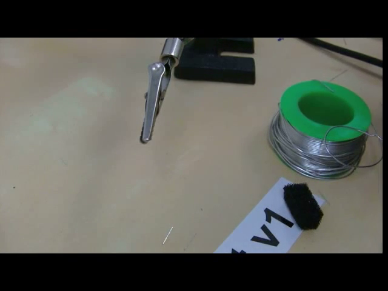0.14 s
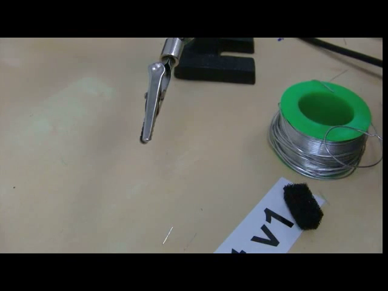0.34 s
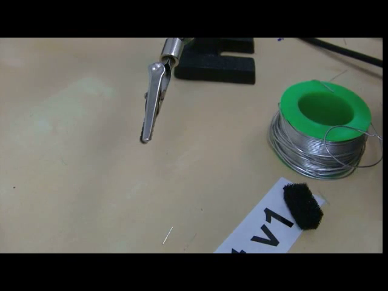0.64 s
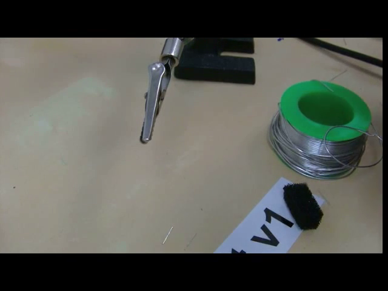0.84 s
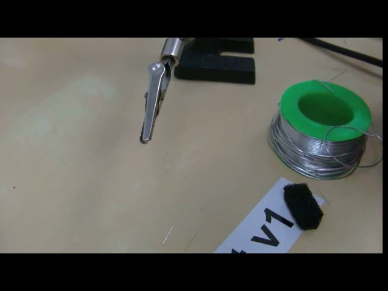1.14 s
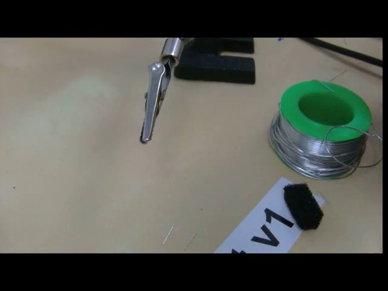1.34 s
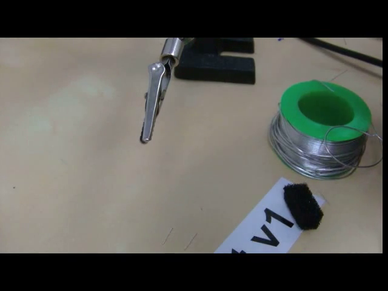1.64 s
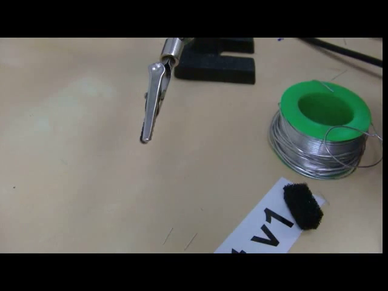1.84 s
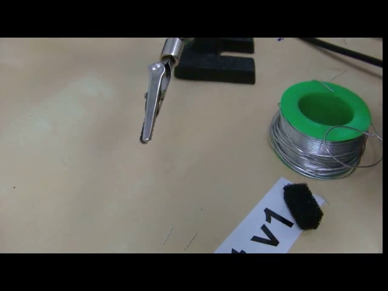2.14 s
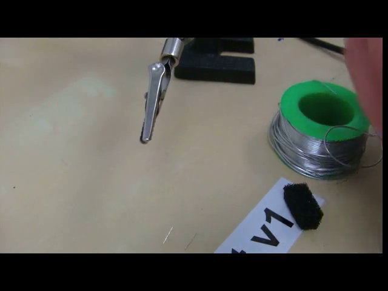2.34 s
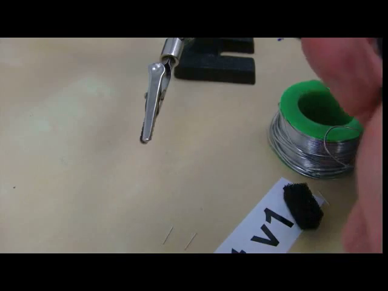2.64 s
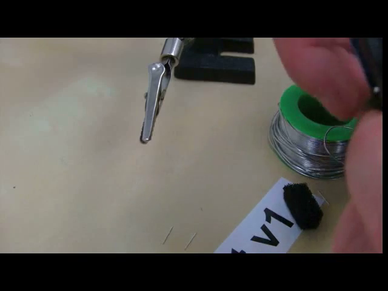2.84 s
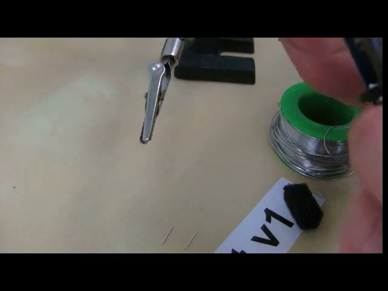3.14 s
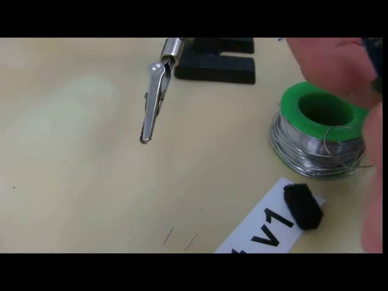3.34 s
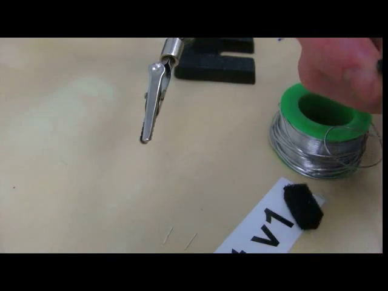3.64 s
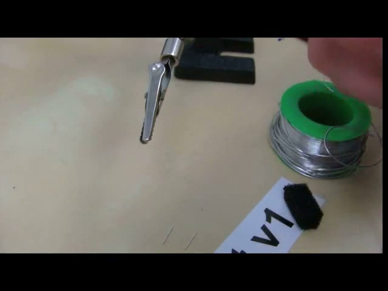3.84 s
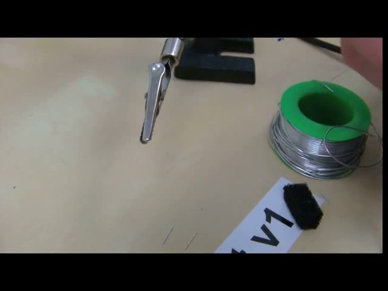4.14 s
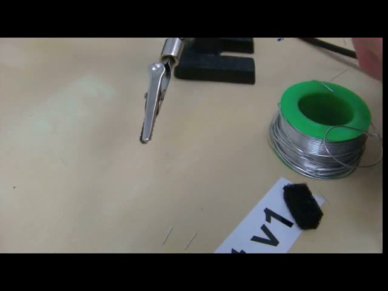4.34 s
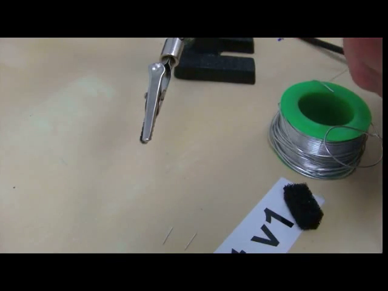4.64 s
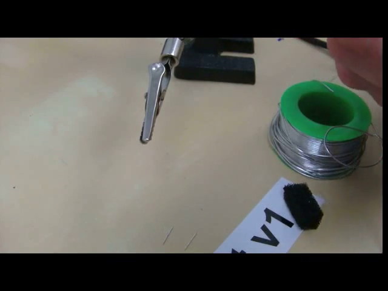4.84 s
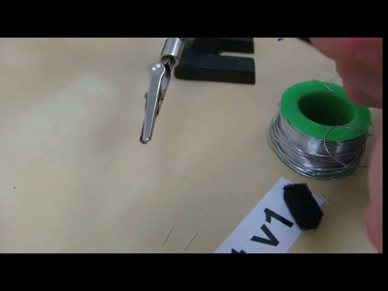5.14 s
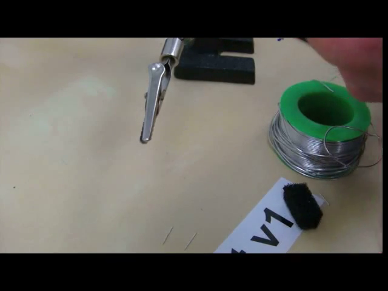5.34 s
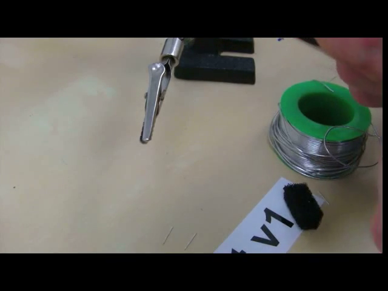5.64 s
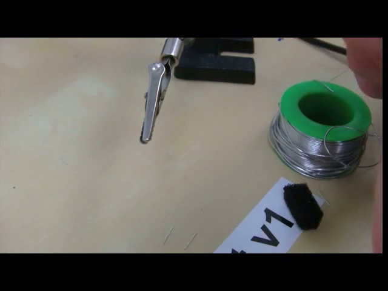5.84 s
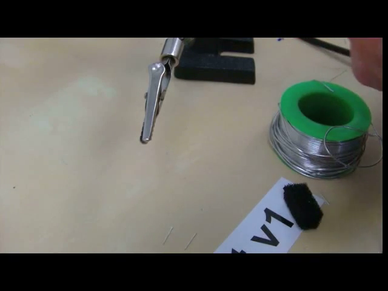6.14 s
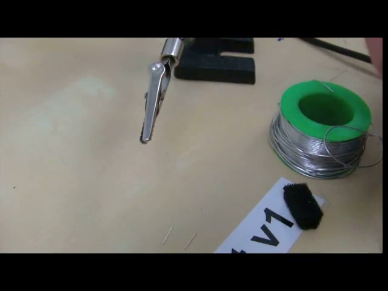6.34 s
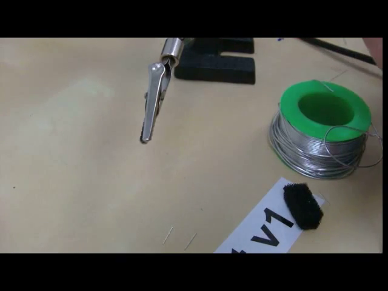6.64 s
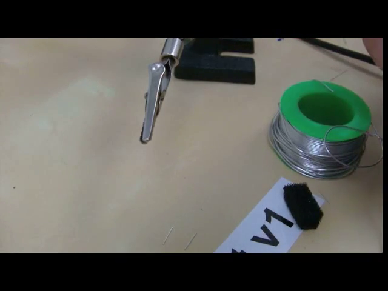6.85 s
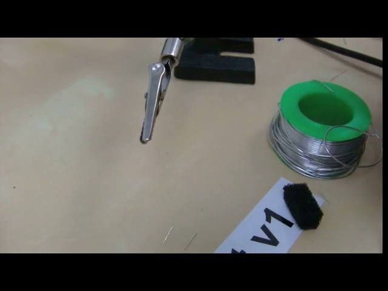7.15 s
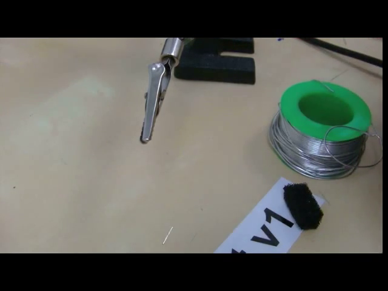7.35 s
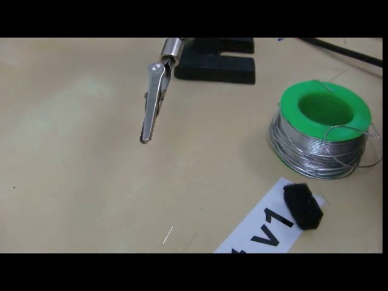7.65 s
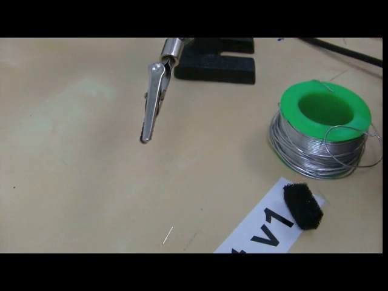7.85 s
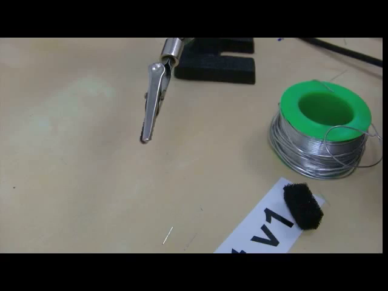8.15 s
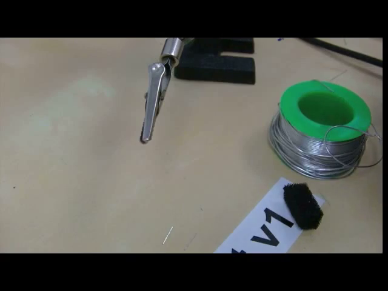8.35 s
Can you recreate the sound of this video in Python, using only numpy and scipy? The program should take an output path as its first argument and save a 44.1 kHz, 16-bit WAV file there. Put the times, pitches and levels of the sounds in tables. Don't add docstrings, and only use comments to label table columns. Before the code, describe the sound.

A steady low fan hum with soft hiss fills a quiet indoor workbench. After a few faint finger ticks, a plastic cable tie feeds softly through its ratchet, then zips in a rapid loud burst of bright clicks. A pause, a slower crawl of dry clicks, then a few hard tugs and sparse snaps, ending in one loud sharp snap. Close microphone, small room.

```python
import sys
import numpy as np
from scipy import signal
from scipy.fft import rfft, irfft
from scipy.io import wavfile
from scipy.ndimage import uniform_filter1d

SR = 44100
rng = np.random.default_rng(int(sys.argv[2]) if len(sys.argv) > 2 else 0)


def output_pcm(signal):
    pcm = np.clip(np.atleast_2d(signal).T, -1, 1) * 32767
    wavfile.write(sys.argv[1], SR, np.round(pcm).astype(np.int16))


def field_ratio(decibels):
    return 10 ** (np.asarray(decibels, dtype=float) / 20)


N = 373968

# start in seconds, rms level over 3 ms in dB, strongest ring in Hz.
FEED_SNAPS = [
    (2.8139, -41.5, 8750),
    (2.877, -56.5, 7150),
    (2.932, -49, 5600),
    (2.9831, -45, 5070),
    (3.0276, -41, 6350),
    (3.0663, -43, 6500),
]
ZIP_SNAPS = [
    (3.2166, -34.5, 8910),
    (3.2201, -32, 8950),
    (3.2465, -30, 5960),
    (3.3459, -31, 5940),
    (3.3694, -31, 5940),
]
RUN_SNAPS = [
    (3.3873, -31, 10550),
    (3.404, -35, 8870),
    (3.4078, -26.5, 5530),
    (3.4294, -31.5, 5990),
    (3.45, -31.5, 10400),
    (3.499, -29, 10340),
    (3.5187, -30, 10100),
    (3.5375, -32, 10100),
    (3.5648, -31, 9900),
]
CRAWL_SNAPS = [
    (4.641, -36.5, 10600),
    (4.6852, -36, 9900),
    (4.7133, -36, 9860),
    (4.7511, -35, 9800),
    (4.778, -34, 9820),
    (4.8178, -33.5, 9800),
    (4.859, -33, 10000),
]
CINCH_SNAPS = [
    (5.3693, -34, 12920),
    (5.3841, -32, 10300),
    (5.4055, -29, 13500),
]
DRAW_SNAPS = [
    (5.507, -27.5, 11900),
    (5.5926, -26, 12700),
]
TUG_SNAPS = [
    (5.786, -29, 6240),
]
SNUG_SNAPS = [
    (6.4718, -34.5, 7040),
    (6.5185, -35, 7540),
    (6.6505, -34, 7540),
]
STRAIN_SNAPS = [
    (7.7563, -37.5, 7600),
    (7.9043, -37, 9300),
]
LOCK_SNAPS = [
    (7.9166, -23, 8970),
]

# centre in Hz, width in Hz.
HEAD_MODES = [(1150, 700), (1800, 790), (2450, 450), (3300, 800), (4550, 870), (6000, 1080), (7300, 1640),
              (8800, 1400), (10400, 1700), (12000, 1540), (13300, 1950), (15000, 1630)]
# level in dB, lowest mode first.
SLACK_HOLD = (-14, -6, -1, -4.5, -1.5, -2, -4, -4, -16, -12, -14, -12)
PINCHED_HOLD = (-21, -12, -7, -18, -3, 0.5, -21, -2, -5.5, -10, -11, -1)
FIRM_HOLD = (-18, -15.5, -17, -14.5, -3.5, -2.5, -4.5, -3.5, -1, -10, -7, -5)
COVERED_HOLD = (-20, -16.5, -15, -13, -10, -7.5, -9, -14, -1, -12, -11, -7)
TAUT_HOLD = (-12, -17, -18, -13.5, -9, -4.5, -2, -10, -4, -2, -5, -4)
BOWED_HOLD = (-10, -12, -10, -8.5, -2.5, -8, 1, -8, -17, 2, 1, -2)
TILTED_HOLD = (-13, -15, -13, -10.5, -35, 3, 1, -22, -3, -0.5, 0, 0)
TURNED_HOLD = (-14, -16, -16, -14, -20, -10, -1.5, -13, -8, -4, -6, -4)
STRETCHED_HOLD = (-15, -14, -4, -9, -22, -10, -9, -11, -0.5, -5, -1, -3)
LOCKED_HOLD = (-11, -7, 1.5, -14, -5, 0, -3, 5.5, -1, -3, 5, 3)
# chatter in dB, chatter t60 in seconds, ring share in dB, room in dB, mode pitch factor.
PULL_FEEL = [
    (-14, 0.0083, -1, -26.5, 0.986),
    (-3, 0.0076, -25, -23, 0.984),
    (-5, 0.0045, -10, -24.5, 1),
    (8, .0026, -13, -26, 0.951),
    (-12, 0.0037, -12, -26.5, 0.996),
    (-8, 0.0037, -3, -27, 0.995),
    (-13, 0.0015, -36, -28.5, 1.05),
    (-8, .0037, -8, -24.5, 0.985),
    (-1, 0.0033, -6.5, -22, 1.08),
    (-13, .002, -4, -16.5, 1.035),
]

# frequency in Hz, level in dB.
DIFFUSE_COLOUR = [(600, -40), (1500, -15), (4700, -12), (6200, -1), (7300, -3), (9200, 0), (11000, -8),
                  (15000, -9), (15300, -45)]
# frequency in Hz, t60 in seconds.
ROOM_T60 = [(1000, .1), (3500, .13), (6000, .23), (8000, .21), (9500, .23), (11500, .13), (15000, .11)]

# start in seconds, peak in dB, ring in Hz.
FINGER_TICKS = [(1.0894, -59, 3190), (1.408, -41.5, 6350), (1.409, -46, 2800), (1.604, -46.5, 7000),
                (1.673, -51, 5540), (1.684, -48, 4300), (1.7594, -40.5, 6200), (2.4023, -46.5, 6950),
                (2.4309, -45, 4700), (2.6794, -54, 5520), (2.714, -54, 3440), (2.896, -52, 4500),
                (2.9674, -55, 5170), (3.04, -54, 3130), (3.0534, -50, 6200), (3.743, -43, 3340),
                (3.81, -46, 3530), (3.8145, -37, 3240), (3.9629, -56, 9500), (4.298, -49.5, 3280),
                (4.442, -48.5, 4270), (4.971, -59, 9000), (5.8785, -52, 3360), (6.066, -58, 6200),
                (6.165, -58, 8300)]
# start in seconds, length in seconds, centre in Hz, width in Hz, level in dB.
SOFT_RUBS = [
    (0.446, .18, 3000, 3000, -67),
    (2.013, 0.22, 2780, 2500, -67),
    (3.398, 0.078, 800, 400, -52),
    (4.5, 0.28, 1740, 60, -59.5),
    (4.5, .25, 4450, 120, -71),
    (5.097, 0.21, 3500, 3000, -70),
]

# frequency in Hz, density in dB per Hz.
HOUSING_HUM = [(12, -66), (20, -63), (54, -21.5), (91, -26.5), (113, -28.5), (246, -9.5), (270, -12),
               (394, 1.5), (424, -14), (455, -1), (536, -4.5), (576, -2), (826, -3), (1140, -5.5),
               (1500, -12), (1950, -54), (3300, -120)]
# time in seconds, level in dB.
HUM_SWELL = [(0.0, -58), (0.23, -59), (0.59, -57.5), (0.99, -58), (1.65, -56.5), (2.55, -58.5), (3.0, -58),
             (4.37, -59.5), (4.67, -59), (7.39, -60), (8.48, -59)]
# frequency in Hz, density in dB per Hz.
FAN_AIR = [(760, -42.5), (1300, 1), (1430, -7.5), (1650, -1), (1830, -3), (1960, -3), (2930, -9),
           (3320, -6.5), (4470, -13.5), (15200, -19)]
# frequency in Hz, width in Hz, level in dB.
BLADE_WHISTLES = [(171.6, 5.6, -79.5), (278.4, 9, -77), (463.2, 11, -77), (581, 12.5, -68.5),
                  (712, 28, -66), (904, 18, -70.5), (976, 9.5, -76.5), (1013, 18, -68)]
# frequency in Hz, rms level in dB.
MOTOR_TONES = [(118.4, -80), (398.4, -75.5), (1141, -71.5)]

EDGE_HZ, TOP_HZ, NOTCH_HZ, SHELF_DB = 15270, 16550, 7900, -19
TOOTH_SCATTER_DB = 1.5
BENCH_ECHO_S, BENCH_ECHO_DB = 0.00148, -20.5
RATTLE_BELOW_ROOM_DB, RATTLE_T60_S = 2.5, 0.024
TICK_T60_S, TICK_BRIGHT, TICK_TOP_HZ = 0.016, 0.54, 9750
AIR_DB = -65


def pull(rows, grip, feel, alike=0.76, build_s=0.00028):
    chatter_db, chatter_t60, ring_db, room_db, pitch = feel
    t = np.arange(1500) / SR - build_s
    decay_db = chatter_db - 60 * t / chatter_t60
    build_db = chatter_db + 12 * t / build_s
    shape = np.where(t > 0, field_ratio(decay_db), field_ratio(build_db))
    rattle_shape = field_ratio(room_db - RATTLE_BELOW_ROOM_DB - 60 * t / RATTLE_T60_S) * (t > 0.0006)
    bins = np.fft.rfftfreq(2048, 1 / SR)
    wide = causal(bins, read(DIFFUSE_COLOUR, bins))
    wide = wide / np.linalg.norm(wide)
    common = rng.standard_normal(len(t))
    direct, around = np.zeros(N), np.zeros(N)
    for s, level_db, ring_hz in rows:
        own, rattle = rng.standard_normal((2, len(t)))
        crack = shape * (alike * common + np.sqrt(max(1 - alike ** 2, 0)) * own)
        crack[np.argmin(abs(t))] += 1
        crack = whitened(crack)
        modes_db = grip + TOOTH_SCATTER_DB * rng.standard_normal(len(HEAD_MODES))
        body = causal(bins, head_colour(bins, modes_db, pitch))
        snap = evened(np.convolve(crack, body)[:len(t)])
        snap = snap + field_ratio(ring_db) * evened(resonate(np.diff(crack, prepend=0), ring_hz, 600.0))
        snap = field_ratio(level_db) * np.sqrt(0.003 * SR) * snap / np.linalg.norm(snap)
        strength = np.linalg.norm(snap)
        rattling = np.convolve(rattle_shape * rattle, wide)[:len(t)]
        add(direct, s - 0.0001, snap + strength * rattling)
        add(around, s, strength * wide)
    direct = signal.lfilter(*signal.butter(2, 500, "high", fs=SR), direct)
    bench = field_ratio(BENCH_ECHO_DB) * np.roll(direct, round(BENCH_ECHO_S * SR))
    return direct + bench + field_ratio(room_db) * room(around)


def head_colour(hz, modes_db, pitch):
    centre, width = np.transpose(HEAD_MODES)[:, :, None]
    flanks = (1 + (2 * (hz - pitch * centre) / width) ** 2) ** 2.2
    power = field_ratio(2 * modes_db)[:, None] / flanks
    low_cut = 1 + (1020.0 / (hz + 1)) ** 12
    return 10 * np.log10(power.sum(0) / low_cut)


def whitened(x):
    z = rfft(x, 4096)
    colour = np.sqrt(uniform_filter1d(abs(z) ** 2, size=70))
    return irfft(z / colour)[:len(x)]


def causal(hz, level_db):
    half = np.log(field_ratio(np.maximum(level_db, -70)))
    whole = np.r_[half, half[-2:0:-1]]
    phase = signal.hilbert(whole).imag[:len(hz)]
    return irfft(np.exp(half - 1j * phase))[:900]


def resonate(x, hz, width):
    r = np.exp(-np.pi * width / SR)
    return signal.lfilter([1 - r], [1, -2 * r * np.cos(2 * np.pi * hz / SR), r * r], x)


def evened(x):
    return x / np.sqrt(np.mean(x ** 2) + 1e-20)


def read(points, hz):
    f, value = np.transpose(points)
    return np.interp(np.log(hz + 1), np.log(f + 1), value)


def add(mix, s, sound):
    part = mix[round(s * SR):][:len(sound)]
    part += sound[:len(part)]


def room(x):
    taps = np.zeros(SR // 2)
    at = np.arange(180, len(taps) - 8, 8)
    taps[at + rng.integers(0, 8, len(at))] = rng.choice([-1., 1.], len(at))
    hz, t, z = signal.stft(taps, SR, nperseg=128)
    decay = field_ratio(-60 * t / read(ROOM_T60, hz)[:, None])
    tail = signal.istft(z * decay, SR, nperseg=128)[1]
    return signal.fftconvolve(x, tail / np.linalg.norm(tail))[:N]


def handling():
    out, t = np.zeros(N), np.arange(1200) / SR
    for s, peak_db, hz in FINGER_TICKS:
        noise = np.convolve(rng.standard_normal(len(t) + 2), [1, 0, -1], "valid")
        crack = noise * field_ratio(-60 * t / TICK_T60_S)
        tick = evened(resonate(crack, hz, 1600.0))
        tick = tick + TICK_BRIGHT * evened(resonate(crack, TICK_TOP_HZ, 5000.0))
        add(out, s + 0.00065, field_ratio(peak_db) * tick / abs(tick).max())
    out = out + field_ratio(-14.5) * room(out)
    for s, length, hz, width, db in SOFT_RUBS:
        noise = rng.standard_normal(round(length * SR))
        noise = np.diff(resonate(noise, hz, 4000.0))
        rub = evened(resonate(noise, hz, width))
        add(out, s, field_ratio(db) * rub * np.hanning(len(rub)))
    return out


def fans():
    s, swell_db = np.transpose(HUM_SWELL)
    swell = field_ratio(np.interp(np.arange(N) / SR, s, swell_db))
    out = swell * wash(HOUSING_HUM, patchy_db=0.9)
    out += field_ratio(AIR_DB) * wash(FAN_AIR, patchy_db=1.93)
    for hz, width, db in BLADE_WHISTLES:
        out += field_ratio(db) * evened(resonate(rng.standard_normal(N), hz, width))
    for hz, db in MOTOR_TONES:
        turns = np.cumsum(hz * (1 + 0.00156 * wander(3.0))) / SR
        level = np.sqrt(2) * field_ratio(db + 0.86 * wander(9.8))
        out += level * np.sin(2 * np.pi * turns)
    return out


def wash(points, patchy_db):
    hz = np.fft.rfftfreq(4096, 1 / SR)
    a, b, patches = rng.standard_normal((N // 1024 + 5, 2049, 3)).T
    patches = uniform_filter1d(patches, size=20, axis=0)
    patches = evened(uniform_filter1d(patches, size=4, axis=1))
    level = field_ratio(read(points, hz)[:, None] + patchy_db * patches)
    z = (a + 1j * b) * level * (hz < EDGE_HZ)[:, None]
    return evened(signal.istft(z, nperseg=4096, noverlap=3072)[1][:N])


def wander(hz):
    t = np.arange(0, N + 256, 256) / SR
    slow = np.zeros(len(t))
    for f in np.geomspace(hz / 20, hz, 20):
        slow += np.sin(2 * np.pi * (f * t + rng.random())) / np.sqrt(f)
    return np.interp(np.arange(N) / SR, t, evened(slow))


def scene():
    pulls = (FEED_SNAPS, ZIP_SNAPS, RUN_SNAPS, CRAWL_SNAPS, CINCH_SNAPS,
             DRAW_SNAPS, TUG_SNAPS, SNUG_SNAPS, STRAIN_SNAPS, LOCK_SNAPS)
    holds = (SLACK_HOLD, PINCHED_HOLD, FIRM_HOLD, COVERED_HOLD, TAUT_HOLD,
             BOWED_HOLD, TILTED_HOLD, TURNED_HOLD, STRETCHED_HOLD, LOCKED_HOLD)
    mix = handling() + fans()
    for rows, hold, feel in zip(pulls, holds, PULL_FEEL):
        mix += pull(rows, np.array(hold), feel)
    return mix[None]


def roll_off(x):
    return signal.sosfilt(signal.butter(12, 16520, fs=SR, output="sos"), x)


def record(dry):
    notched = signal.lfilter(*signal.iirnotch(NOTCH_HZ, 70.0, SR), dry)
    edge = signal.ellip(10, 0.5, 45, EDGE_HZ, fs=SR, output="sos")
    fade = np.cos(np.linspace(0, np.pi / 2, 181)) ** 0.7
    ring = signal.sosfilt(edge, signal.unit_impulse(181)) * fade
    shelf = signal.firwin(361, [EDGE_HZ + 200, TOP_HZ], pass_zero=False, window=("kaiser", 8), fs=SR)
    backwards = np.r_[ring[::-1], 0 * ring[1:]]
    kernel = backwards + field_ratio(SHELF_DB) * shelf
    mix = signal.oaconvolve(notched, kernel[None], "same")
    return roll_off(mix)


dry = scene()
out = record(dry)
output_pcm(out)
```